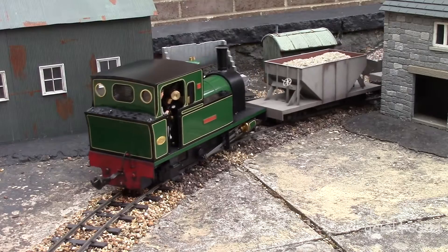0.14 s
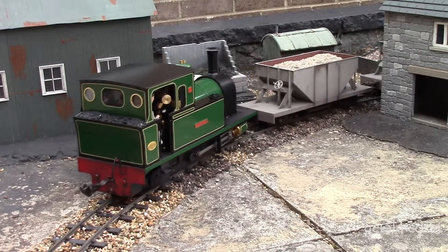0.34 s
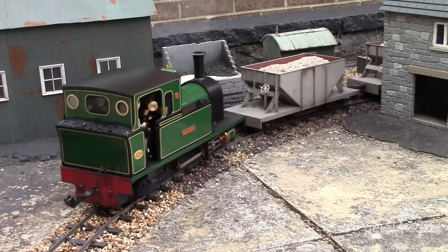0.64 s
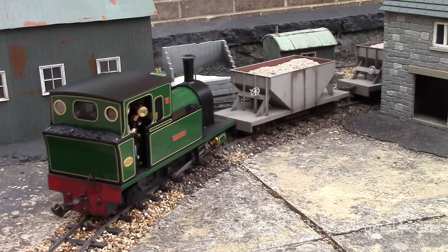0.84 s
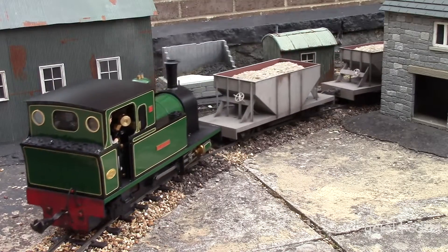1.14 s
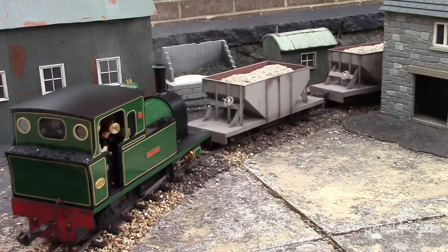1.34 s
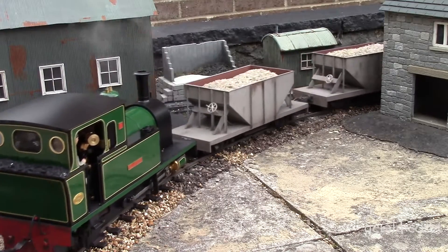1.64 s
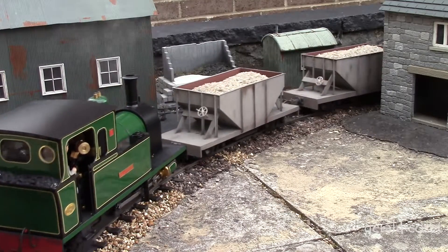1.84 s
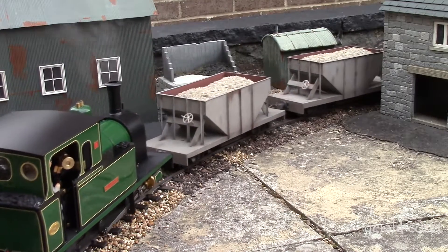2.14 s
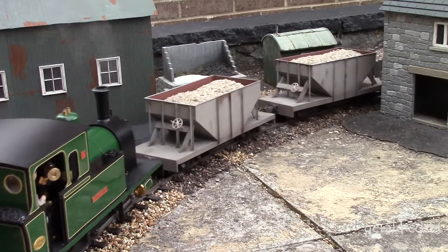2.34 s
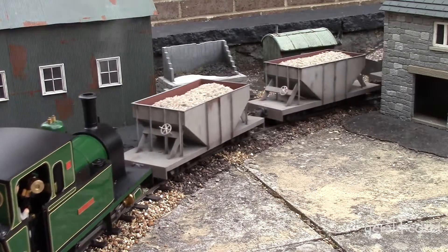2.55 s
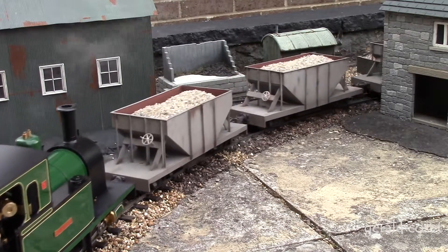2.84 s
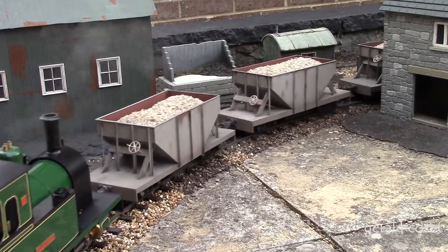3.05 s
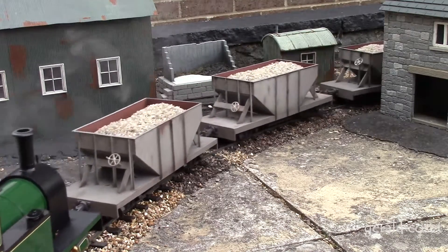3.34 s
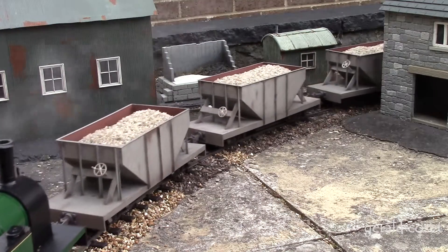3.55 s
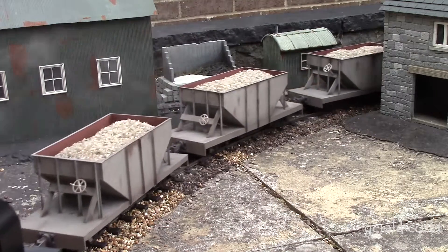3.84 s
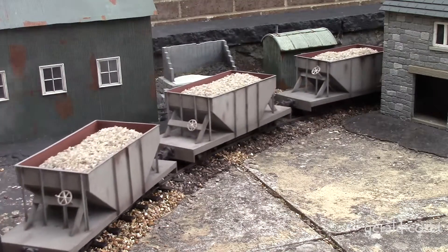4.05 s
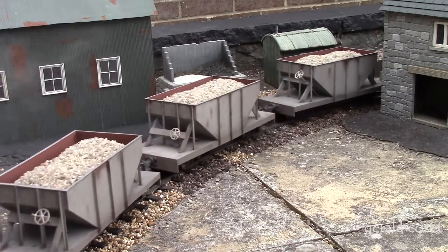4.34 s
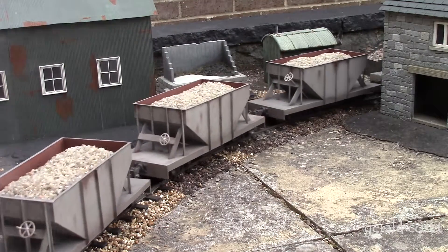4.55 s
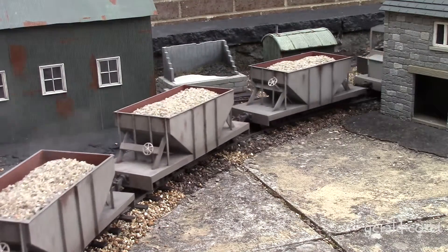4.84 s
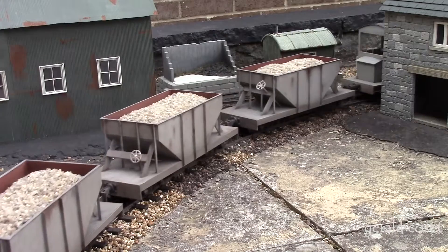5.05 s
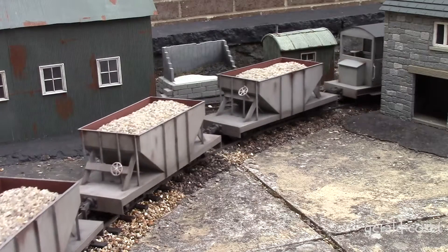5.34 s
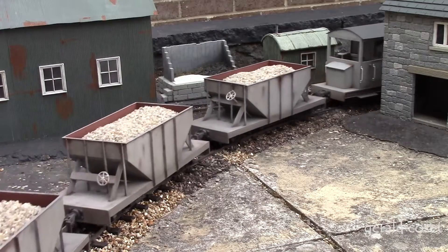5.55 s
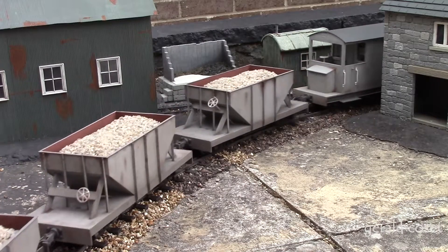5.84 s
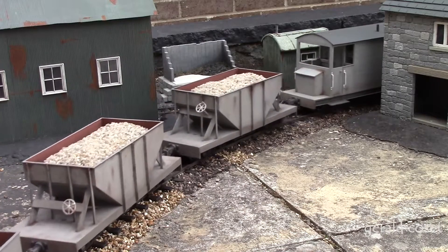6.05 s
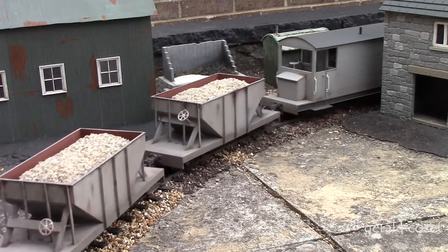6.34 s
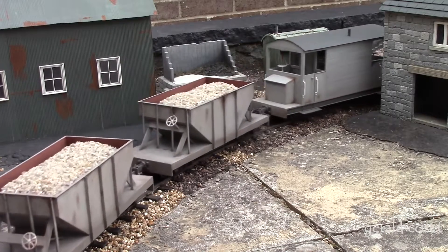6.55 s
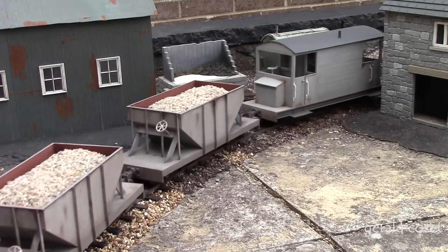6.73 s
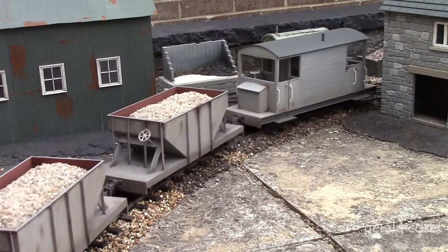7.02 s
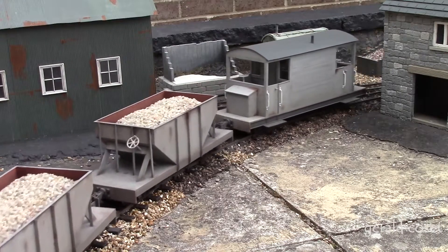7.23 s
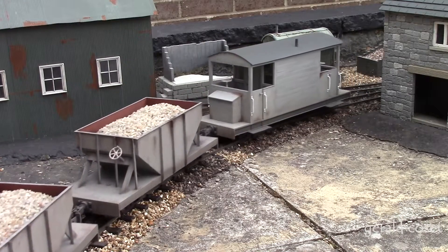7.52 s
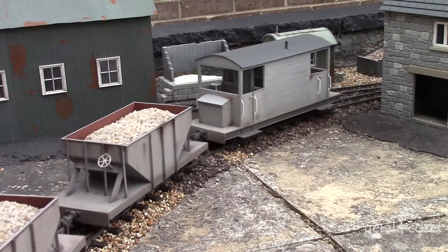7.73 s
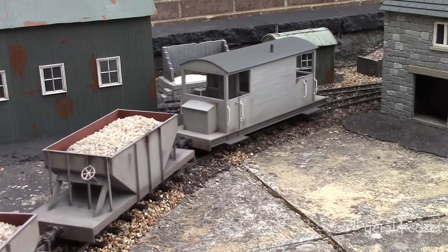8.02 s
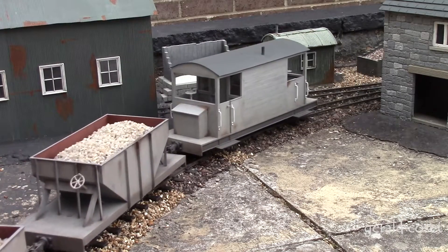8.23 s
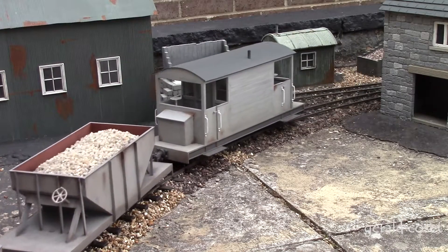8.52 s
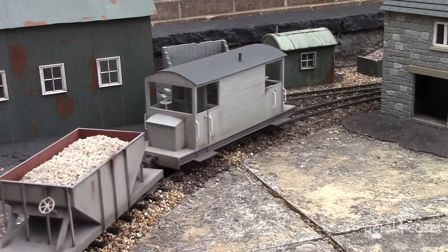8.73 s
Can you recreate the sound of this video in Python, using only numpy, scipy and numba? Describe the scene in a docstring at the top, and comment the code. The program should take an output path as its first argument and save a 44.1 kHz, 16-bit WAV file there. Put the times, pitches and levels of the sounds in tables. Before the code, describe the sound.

A miniature steam locomotive passes close to a stereo microphone in a garden for nearly nine seconds. From the start, rapid, regular chuffs come about six per second, each a short bright jet of wet steam with a hollow pipe colour. Hiss and gurgling fill the gaps, fairly full until about 3 seconds, with tiny water spits popping, notably around 2, 2.4, 4.3 and 5.3. The beats weaken around 3.5 to 4.2, then come back hardest from 4.7 to 5.7, crisp and close. They remain steady afterwards, drifting somewhat left, and soften from about 7.6 to the end, still running. Very short reflections from nearby surfaces tint the steam. Beneath lie a subdued burner roar and low wheel rumble, growing slightly as wagons follow; faint hollow rail knocks occur near 4.3, 4.7, 7.9 and 8.7.

```python
"""A small live-steam locomotive draws loaded wagons slowly past a microphone beside a garden line.
Each exhaust beat is a jet of noise, as of wet steam, ringing three modes of the chimney pipe.
Between beats steam blows by, and bursting water drops spit in the same pipe.
Near surfaces return the steam within milliseconds; the gas burner roars in its flue.
Furthest back the wagon wheels rumble, and knocks over rail joints ring a wagon body."""
import sys
import numpy as np
from scipy import signal
from scipy.fft import rfft, irfft
from scipy.io import wavfile
from scipy.ndimage import uniform_filter1d
from numba import njit

SR = 44100
rng = np.random.default_rng(int(sys.argv[2]) if len(sys.argv) > 2 else 0)


def materialize(psi):
    """Save the field psi as 16-bit PCM at rate SR to the path in sys.argv[1].

    A 1-D psi becomes a single channel; in a 2-D psi each row is a channel.
    """
    bounded = np.clip(np.atleast_2d(psi).T, -1, 1)
    quanta = np.round(bounded * 32767).astype(np.int16)
    wavfile.write(sys.argv[1], SR, quanta)


N = 391608
T = np.arange(N) / SR  # s

# Exhaust beats, and one faint steam leak opening at 8.212 s: opening t/s, peak level/dB, swell t/s,
# fall t/s, first pipe mode against the second level/dB, blow-by until the next opening level/dB
STEAM_BLASTS = [(0.019, -23.5, 0.01, 0.064, -2.5, -33.5), (0.215, -21, 0.019, 0.075, -6, -37),
                (0.394, -23.5, 0.048, 0.039, -3, -32.5), (0.551, -23.5, 0.046, 0.051, -5.5, -31.5),
                (0.738, -23, 0.028, 0.071, -9.5, -32), (0.901, -21, .028, .055, -7.5, -30),
                (1.067, -21.5, 0.0065, 0.053, -5.5, -30), (1.191, -23, 0.056, .029, -8, -25),
                (1.364, -22.5, 0.037, .028, -0.5, -27.5), (1.538, -17.5, 0.037, 0.043, -5.5, -33.5),
                (1.729, -22, 0.025, 0.031, -3.5, -33), (1.894, -18, 0.034, 0.036, -6, -32),
                (2.083, -22, 0.044, 0.04, -4.5, -32.5), (2.259, -20.5, 0.035, 0.041, -7, -31),
                (2.434, -21.5, 0.016, 0.062, -5, -32), (2.585, -19, 0.036, 0.055, -6, -37),
                (2.763, -22, .012, 0.076, -6, -38.5), (2.923, -19, .022, 0.038, -10.5, -35.5),
                (3.089, -20.5, .019, 0.024, -9, -36), (3.232, -19, 0.016, 0.045, -11, -41),
                (3.387, -25, 0.027, 0.036, -6, -47), (3.55, -21.5, 0.025, .022, -10, -41.5),
                (3.711, -27, 0.013, 0.027, -11, -34), (3.804, -26, 0.072, 0.026, -0.5, -44.5),
                (4.016, -24.5, 0.027, 0.021, -7.5, -45.5), (4.194, -21.5, 0.021, 0.046, -2.5, -40),
                (4.309, -21.5, 0.076, 0.034, 1, -38.5), (4.537, -21, 0.015, 0.03, -8, -45),
                (4.725, -16.5, 0.019, .039, -7, -38), (4.91, -15, 0.026, 0.033, -10, -33.5),
                (5.075, -14.5, 0.031, 0.038, -10.5, -29.5), (5.226, -14, 0.027, 0.051, -9, -36.5),
                (5.389, -16.5, 0.046, 0.035, -5.5, -30), (5.559, -14, .035, 0.032, -8.5, -31),
                (5.729, -16.5, .026, 0.033, -7, -34), (5.891, -19.5, .021, 0.031, -4, -38),
                (6.063, -18, 0.018, 0.037, -4, -35.5), (6.236, -18, 0.029, 0.029, -6, -35.5),
                (6.415, -18, 0.021, 0.043, -5, -37), (6.574, -17.5, .034, 0.04, -5.5, -38.5),
                (6.758, -19.5, .032, 0.044, -7, -37), (6.951, -17.5, 0.022, 0.032, -8.5, -33),
                (7.117, -18, 0.018, 0.042, -12, -39.5), (7.274, -16.5, .03, 0.028, -12, -41.5),
                (7.46, -19.5, 0.032, 0.034, -13, -41), (7.66, -21.5, .028, 0.025, -9.5, -38.5),
                (7.853, -22, 0.021, 0.051, -8, -39.5), (8.041, -21, 0.03, 0.029, -10, -44.5),
                (8.212, -38.5, .004, .04, 1, -48), (8.258, -24.5, 0.039, 0.043, -7, -45.5),
                (8.479, -24.5, 0.046, 0.044, -7, -40.5), (8.696, -23.5, 0.039, 0.046, -8.5, -41)]
# Chimney colour as it turns and moves off, against the second pipe mode: t/s, first mode of the blow-by
# level/dB, third mode level/dB, shoulder above the first mode level/dB, bare jet level/dB,
# fizz above the third mode level/dB
CHIMNEY_COLOUR = [(0, -1.5, 0.2, -1, -2.5, -31), (1, -7, 4.5, -1, -2.5, -34), (2, 1.5, 3.5, -11.5, -5, -22),
                  (3.1, -5.5, 4, 2, 1.5, -35), (3.7, -2, 5.5, 1, 4.5, -28),
                  (4.3, -5, -1.5, -3.5, -0.5, -34), (4.75, -2, -1, -5.5, -35, -25),
                  (5.4, -6, -2, -18, -13, -9), (6, -3.5, -3.5, -10, -11, -9),
                  (6.7, -2.5, -1.5, -10, -6, -13), (7.3, -9.5, -2.5, -1, -20, -10),
                  (8, -5, -3, -10, -8, -15), (8.88, -7, -1, -9, -6, -7)]
# Resonances making up each pipe mode: offset from its centre f/Hz, width f/Hz, relative level/dB
FIRST_MODE = [(0, 240, 8.5), (-500, 1500, -10.5)]
SECOND_MODE = [(-51, 740, 6.5), (491, 1350, 3), (-900, 2350, -5)]
THIRD_MODE = [(17, 1690, 4.5), (-1500, 870, -0.5), (1080, 510, 1)]
# Spectrum of the bare jet beside the pipe modes: f/Hz, relative level per Hz/dB
JET_SPECTRUM = [(1200, -19), (2000, -15), (2700, 3), (3300, -31), (5000, -9), (9000, 8), (12000, 3),
                (13500, -32), (15000, -27)]
# Water drops bursting in the pipe: t/s, nominal peak level/dB
WATER_SPITS = [(0.1485, -12), (0.5194, -18), (1.3294, -10), (2.0408, -5), (2.391, -6), (3.301, -12),
               (3.621, -11.5), (3.6394, -15), (3.676, -17), (3.945, -17), (4.0994, -23), (4.1607, -13.5),
               (4.2774, -27), (4.288, -8), (4.8409, -13.5), (5.189, -14), (5.2091, -20), (5.323, -6.5),
               (7.92, -13), (8.2127, -11.5), (8.314, -7.5), (8.667, -18), (8.784, -9), (8.8534, -22)]
# Where the engine stands: t/s, left minus right level/dB
ENGINE_PAN = [(0.0, 0.0), (0.54, 0.5), (3.73, 1.5), (6.87, 4.0), (8.38, 3.0), (8.88, 1.5)]
# Surfaces that echo the chimney: delay at the start t/ms, growth of delay/(ms per s), strongest level/dB,
# moment of that t/s, fading away from it/(dB per s), left early and right late by t/ms
NEAR_SURFACES = [(2.85, 0.133, -12, 3.7, 12, 0.012), (2, .25, -9.5, .7, 4.5, 0.0082),
                 (1.47, 0.0069, -5.5, 5.2, 10, 0.003), (0.7, 0.072, -13, 0.39, 10, 0.0036),
                 (1, 0.047, -8, 4.65, 16, .003), (-0.3, .22, -10.5, 6.5, 10, 0.012),
                 (1.7, 0.0029, -5.5, 7.1, 4.5, 0.016)]
# Gas burner: t/s, flue mode f/Hz, level/dB, upper mode against the flue mode level/dB
BURNER_FLUE = [(0, 905, -37.5, -2), (0.95, 910, -37, -7.5), (1.25, 834, -33, -1.5), (1.9, 780, -38.5, 0.5),
               (2.5, 924, -35, -20), (3.24, 905, -37, -14), (3.8, 990, -34, -11), (4.8, 972, -33.5, -16),
               (5.4, 976, -32, -10), (6.5, 950, -36, -3), (7.5, 976, -34.5, -23), (8.26, 990, -44, -0.5),
               (8.88, 880, -42, -4.5)]
# Wagons rolling by: t/s, rumble level/dB
WAGON_LEVEL = [(0, -42), (2.1, -41.5), (3.4, -37.5), (4.9, -38), (8, -36), (8.88, -39)]
# Spectrum of the wheel rumble: f/Hz, relative level per Hz/dB
RUMBLE_SPECTRUM = [(20, -26), (40, -30), (84, -11), (150, -2), (295, -0.5), (390, -3), (480, -3.5),
                   (620, -2.5), (800, -7.5), (1500, -22.5), (3000, -31.5)]
# Wheels over rail joints: t/s, strength of the blow level/dB
JOINT_KNOCKS = [(4.286, -42), (4.73, -34), (7.918, -36), (8.668, -32), (8.683, -33.5)]
# Modes of a knocked wagon body: f/Hz, level against the blow/dB, decay by 60 dB t/s
BODY_MODES = [(625, 9.5, 0.097), (523, 1, 0.041), (760, 7, 0.018)]

FIRST_HZ, SECOND_HZ, THIRD_HZ = 3550, 6780, 10080  # chimney pipe modes
SHOULDER_HZ, FIZZ_HZ = 3993, 12150
# the third mode starts lower and rises to its pitch over the first 1.4 s
THIRD_RISE_HZ_PER_S, THIRD_SETTLES_S = 530, 1.4
# a blast starts under its peak, the further the longer it swells, down to a limit
OPEN_DB, SWELL_DB_PER_S, DEEPEST_DB = -2, 175, -7
CRACK_DB_PER_S = 1500  # rise up to the moment of opening
LEAK_SAG_DB_PER_S = 22.5  # blow-by dies away after each opening
SPIT_CREST_DB = 19  # peak of a spit over the rms level of each pipe mode
SPIT_FIRST_DB, TICK_DB = 3, -12  # first pipe mode and hard edge against the peak of a spit
DRIPS, DRIP_DB, DRIP_RANGE_DB = 120, -29.5, 13  # count, weakest nominal peak, range above it
SCATTER_DB = -17.5  # each weak return, before it comes and goes
HOPPER_HZ, HOPPER_WIDTH_HZ, HOPPER_DB = 393, 55, -14  # the rolling wagon bodies hum
WAGON_PAN_DB = 1.14  # left minus right
TOP_HZ = 14800  # the microphone's upper limit


def undb(db):
    """Gain of a level in dB."""
    return 10 ** (np.asarray(db) / 20)


def unit(x):
    """Scale a signal to rms 1."""
    return x / np.sqrt(np.mean(x ** 2))


def curves(table):
    """Join every column after the first by straight lines in time."""
    s, *columns = np.transpose(table)
    return [np.interp(T, s, c) for c in columns]


def walk(rate):
    """Random levels held for 1 / rate s and slewed twice, rms 1."""
    hold = int(SR / rate)
    steps = np.repeat(rng.standard_normal(N // hold + 1), hold)
    slewed = uniform_filter1d(uniform_filter1d(steps, hold), hold)
    return unit(slewed[:N])


@njit
def svf(x, hz, width):
    """State-variable band-pass with a moving centre, gain 1 there."""
    y, band, low = np.empty(len(x)), 0., 0.
    for i in range(len(x)):
        g, k = np.tan(np.pi * hz[i] / SR), width / hz[i]
        v = (band + g * (x[i] - low)) / (1 + g * (g + k))
        band, low, y[i] = 2 * v - band, low + 2 * g * v, k * v
    return y


def ring(x, hz, width):
    """A steep resonance: two equal band-passes in series, each wider than the pair."""
    each = width / np.sqrt(np.sqrt(2) - 1)
    return svf(svf(x, hz, each), hz, each)


def colour(x, points):
    """Shape noise to (f/Hz, level/dB) points over log frequency, rms 1."""
    hz, db = np.transpose(points)
    f = np.fft.rfftfreq(N, 1 / SR) + 1
    gain = undb(np.interp(np.log(f), np.log(hz), db))
    return unit(irfft(rfft(x) * gain, N))


def delayed(x, ms):
    """Read x a moving number of milliseconds late, as over a changing distance."""
    return np.interp(np.arange(N) - ms * SR / 1000, np.arange(N), x, left=0)


def blasts():
    """Power of beats and leak in the first two modes: steam cracks open, swells to a peak and falls."""
    power = np.zeros((2, N))
    for s, db, rise, fall, first_db, _ in STEAM_BLASTS:
        i = slice(max(int((s - .05) * SR), 0), int((s + .3) * SR))
        t = T[i] - s
        front_db = max(OPEN_DB - SWELL_DB_PER_S * rise, DEEPEST_DB)
        swell_db = front_db * np.clip(1 - t / rise, 0, 1) ** 1.18
        crack_db = CRACK_DB_PER_S * np.minimum(t, 0)
        fall_db = 9.46 * (np.maximum(t - rise, 0) / fall) ** 1.54  # on a beat, the cylinder empties
        mode_db = db + np.array([[first_db], [0]])
        power[:, i] += undb(2 * (mode_db + swell_db + crack_db - fall_db))
    return power


def blow_by():
    """Power of wet steam leaking between openings: it sags after each one and gurgles."""
    opens, leak_db = np.transpose(STEAM_BLASTS)[[0, 5]]
    last = np.maximum(np.searchsorted(opens, T) - 1, 0)
    # the sagging leak passes its listed level 0.13 s after opening
    sag_db = LEAK_SAG_DB_PER_S * (T - opens[last] - .13)
    leak_db = uniform_filter1d(leak_db[last] - sag_db, SR // 50)
    return undb(2 * (leak_db + 1.07 * walk(45)))


def water_spits():
    """Power of bursting drops: listed spits swell and die in milliseconds, small drips fall at random."""
    spits = np.zeros(N)
    for s, db in WATER_SPITS:
        peak_s = s + .001
        time_constant = np.where(T < peak_s, .0004, .003)
        spits += undb(2 * (db - SPIT_CREST_DB)) * np.exp(-np.abs(T - s - .001) / time_constant)
    when, size = rng.random((DRIPS, 2)).T
    drips = np.zeros(N)
    drips[(when * N).astype(int)] = undb(2 * (DRIP_DB - SPIT_CREST_DB + DRIP_RANGE_DB * size))
    return spits + signal.lfilter([1], [1, -np.exp(-1 / (0.0033 * SR))], drips)


def flow():
    """Steam flow driving the three pipe modes (rows): blasts, blow-by and spits add as power."""
    first_db, third_db = curves(CHIMNEY_COLOUR)[:2]
    power = blasts()
    leak = blow_by()
    spits = water_spits()
    first_leak = leak * undb(2 * (first_db + 1.35 * walk(15)))
    first = power[0] + first_leak + spits * undb(2 * SPIT_FIRST_DB)
    second = power[1] + leak + spits
    third = undb(2 * third_db) * (power[1] + leak * undb(2 * -1.5)) + spits * undb(2 * -1.5)
    return np.sqrt([first, second, third])


def exhaust(drives):
    """Turbulent, spluttering jet noise, partly bare and partly rung through the chimney pipe."""
    shoulder_db, jet_db, fizz_db = curves(CHIMNEY_COLOUR)[2:]
    splutter = undb(0.72 * walk(120) + 0.6 * walk(600))

    def jet():
        """Fresh turbulence under the shared splutter."""
        return splutter * rng.standard_normal(N)

    out = undb(jet_db) * np.sqrt(drives[0] * drives[1]) * colour(jet(), JET_SPECTRUM)
    shoulder_hz = SHOULDER_HZ * (1 + 0.03 * walk(4))
    out += undb(shoulder_db) * drives[0] * unit(ring(jet(), shoulder_hz, 520.0))
    out += undb(fizz_db) * drives[2] * unit(ring(jet(), FIZZ_HZ + 0 * T, 1300.0))
    third_hz = THIRD_HZ - THIRD_RISE_HZ_PER_S * np.maximum(THIRD_SETTLES_S - T, 0)
    centres = (FIRST_HZ, SECOND_HZ, third_hz)
    for drive, centre, parts in zip(drives, centres, (FIRST_MODE, SECOND_MODE, THIRD_MODE)):
        hz = centre * (1 + 0.011 * walk(8.7))  # hotter or wetter steam shifts the mode a little
        mode = sum(undb(db) * ring(jet(), hz + offset, 1. * width) for offset, width, db in parts)
        out += drive * undb(0.25 * walk(30)) * unit(mode)
    return out


def ticks():
    """The hard edge of each listed bursting drop: about a millisecond of broad mid-range noise."""
    gate = np.zeros(N)
    for s, db in WATER_SPITS:
        gate += undb(db + TICK_DB) * (T >= s) * np.exp(-np.abs(T - s) / 0.0011)
    return gate * unit(svf(rng.standard_normal(N), 2800 + 0 * T, 3500.))


def echoes(x):
    """Near surfaces return the sound, a little apart on the two sides, strongest as the engine passes."""
    out = np.zeros((2, N))
    for ms, growth, db, s, fade_db, lead_ms in NEAR_SURFACES:
        late = np.maximum(ms + growth * T, .1)
        sides = np.array([delayed(x, late - lead_ms), delayed(x, late + lead_ms)])
        out += undb(db - fade_db * np.abs(T - s)) * sides
    return out


def walls(x):
    """Weak returns from wagons and buildings; as the train moves they drift and come and go."""
    out = np.zeros((2, N))
    for start, drift, lead in rng.random((8, 3)):
        path_ms = .8 + 3.2 * start + (drift - .5) * .3 * T + .1 * walk(2.5)
        ms = np.abs(path_ms) + .3
        lead_ms = 0.02 * (lead - .5)
        sides = np.array([delayed(x, ms - lead_ms), delayed(x, ms + lead_ms)])
        out += undb(4.2 * walk(2.24)) * sides
    return undb(SCATTER_DB) * out


def burner(drives):
    """Flame roar in two flue modes; the narrow core runs on, the blast lifts the broad roar around it."""
    hz, db, upper_db = curves(BURNER_FLUE)
    narrow, wide, upper = rng.standard_normal((3, N)) * undb(1.3 * walk(25))
    draught = drives[0] / uniform_filter1d(drives[0], SR // 2)  # steam flow against its half-second mean
    roar = draught ** .12 * unit(ring(narrow, hz * (1 + .013 * walk(5)), 125.))
    roar += undb(-0.5) * draught ** .5 * unit(ring(wide, hz, 740.0))
    roar += undb(upper_db) * draught ** 0.5 * unit(ring(upper, 1340 + 0 * T, 140.0))
    # a faint separate roar, opposite on the two sides, widens the burner
    spread = undb(-27.5) * unit(ring(rng.standard_normal(N), hz, 270.0))
    return undb(db) * (roar + spread * np.array([[1], [-1]]))


def rumble():
    """Wheel noise nearly alike on both sides, wider in the deep bass, with a hum of the wagon bodies."""
    db, = curves(WAGON_LEVEL)
    mid, side = (colour(rng.standard_normal(N), RUMBLE_SPECTRUM) for _ in range(2))
    deep = signal.sosfilt(signal.butter(2, 70, fs=SR, output="sos"), side)
    side = undb(-16.0) * side + undb(-4.5) * deep
    hum_gain = undb(HOPPER_DB + 4.2 * walk(3.1))
    hum_hz = HOPPER_HZ * (1 + 0.025 * walk(1.547))
    mid = mid + hum_gain * unit(ring(mid, hum_hz, 1. * HOPPER_WIDTH_HZ))
    return undb(db + 1.3 * walk(3.19)) * (mid + side * np.array([[1], [-1]]))


def knocks():
    """Wheels strike rail joints; each blow rings the decaying modes of a wagon body."""
    t = T[:SR // 4]
    body = sum(undb(db) * np.sin(2 * np.pi * hz * t) * undb(-60 * t / t60) for hz, db, t60 in BODY_MODES)
    blows = np.zeros(N)
    for s, blow_db in JOINT_KNOCKS:
        blows[int(s * SR)] = undb(blow_db)
    return signal.fftconvolve(blows, body)[:N]


def wagons():
    """Rumble and knocks together, the left side slightly the stronger."""
    return (rumble() + knocks()) * undb(np.array([[WAGON_PAN_DB], [-WAGON_PAN_DB]]) / 2)


def scene():
    """The engine moves between centre and left, its steam panned much further than its roar."""
    drives = flow()
    pan_db, = curves(ENGINE_PAN)
    sides_db = np.array([pan_db, -pan_db]) / 2
    steam = exhaust(drives) + ticks()
    chimney = (steam + echoes(steam) + walls(steam)) * undb(sides_db)
    return chimney + burner(drives) * undb(0.067 * sides_db) + wagons()


def record(dry):
    """The microphone lacks deep bass, falls off in the high treble, rounds the peaks and cuts the top."""
    soft = signal.sosfilt(signal.butter(2, 60, "high", fs=SR, output="sos"), dry)
    soft = signal.sosfilt(signal.butter(4, 13000, fs=SR, output="sos"), soft)
    rounded = np.tanh(0.91 * soft) / 1.231
    return signal.sosfilt(signal.ellip(8, .2, 70, TOP_HZ, fs=SR, output="sos"), rounded)


dry = scene()
out = record(dry)
materialize(out)
```